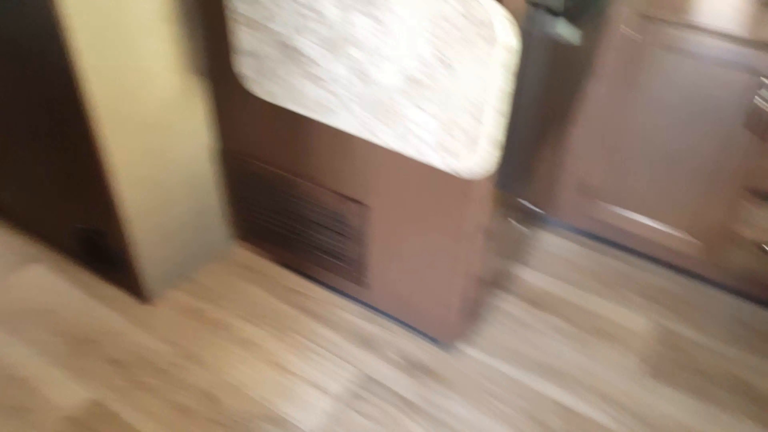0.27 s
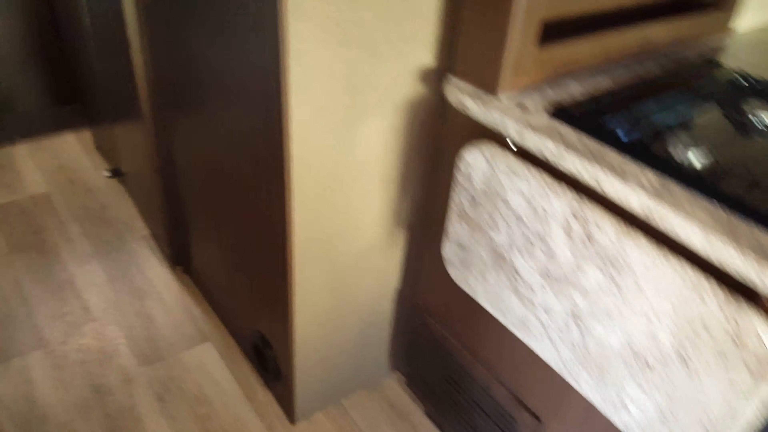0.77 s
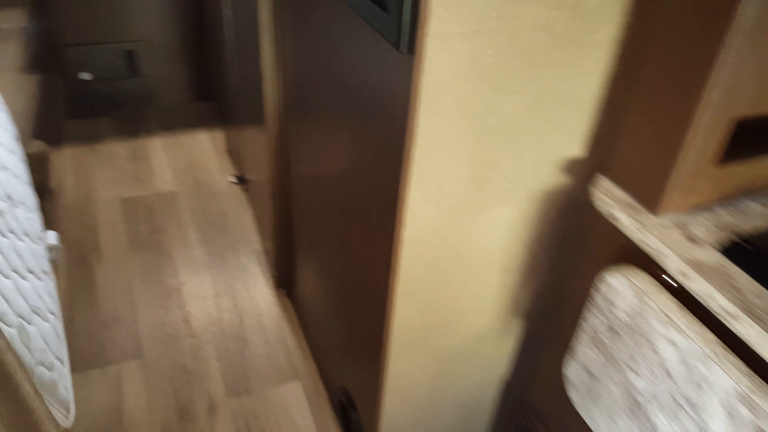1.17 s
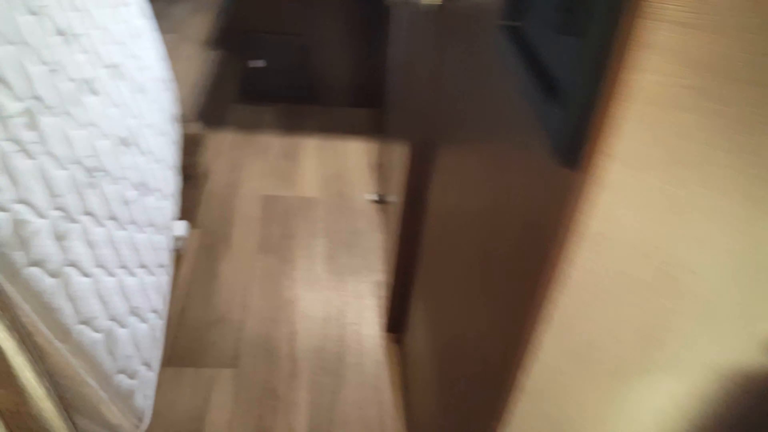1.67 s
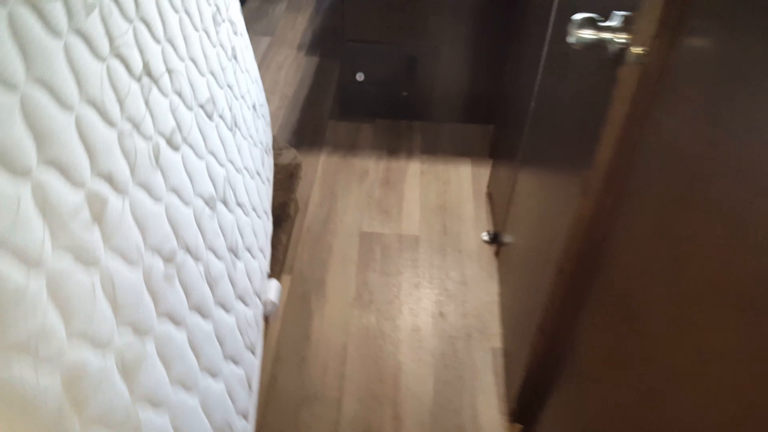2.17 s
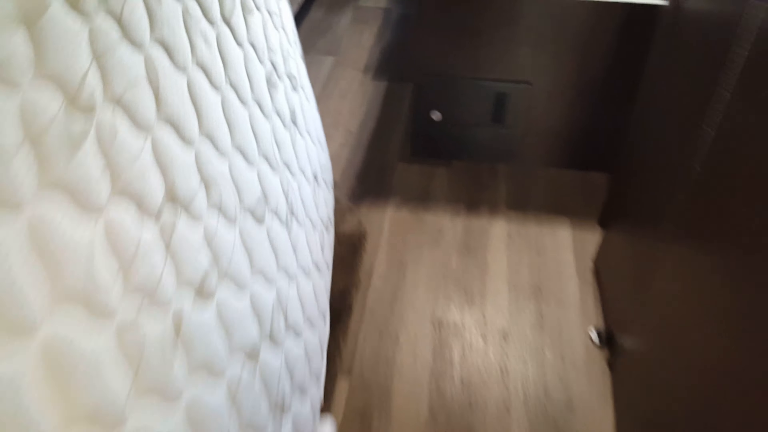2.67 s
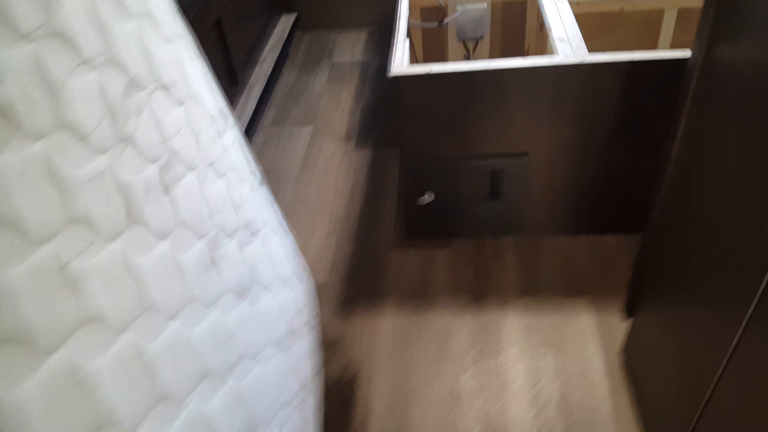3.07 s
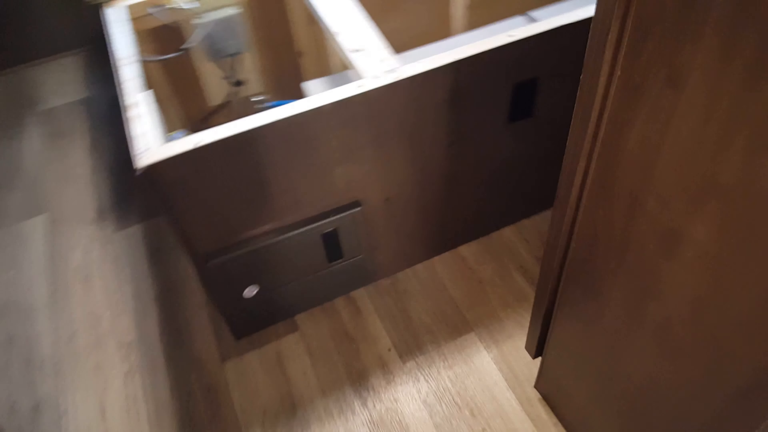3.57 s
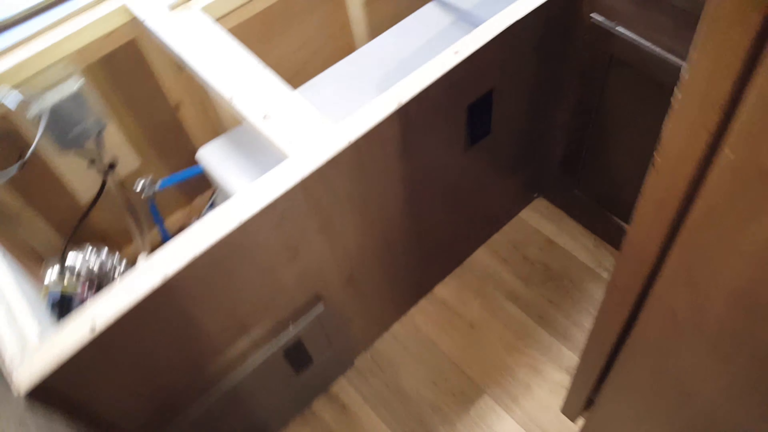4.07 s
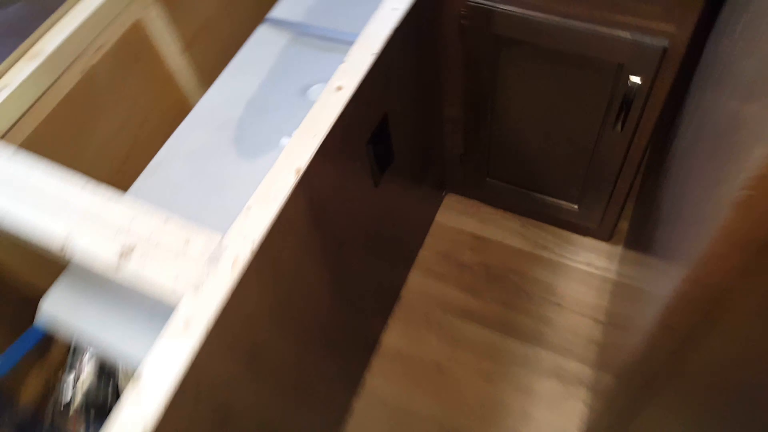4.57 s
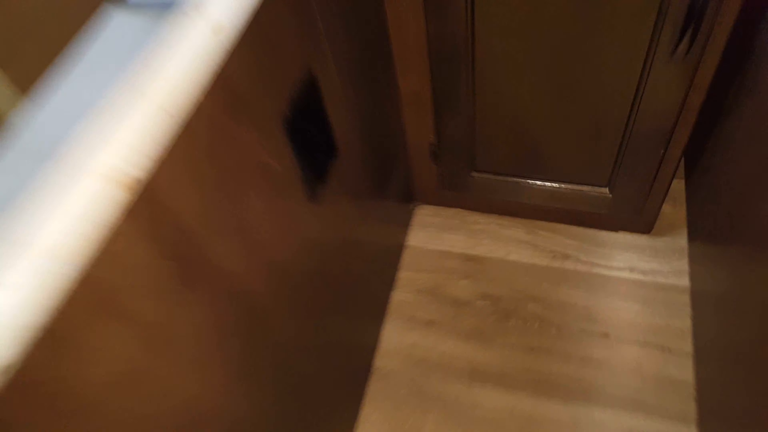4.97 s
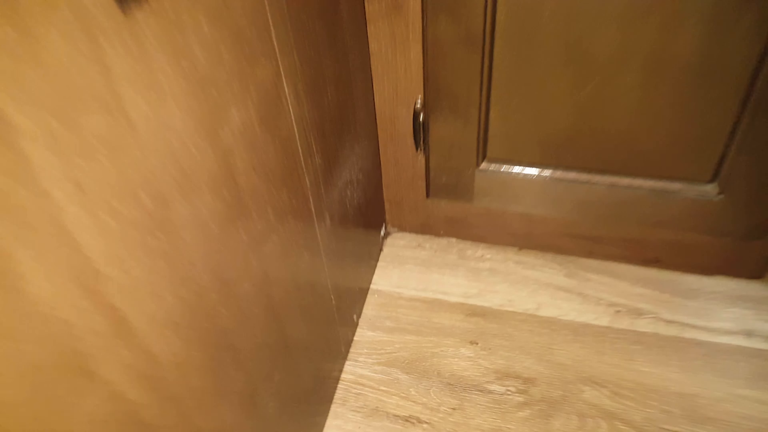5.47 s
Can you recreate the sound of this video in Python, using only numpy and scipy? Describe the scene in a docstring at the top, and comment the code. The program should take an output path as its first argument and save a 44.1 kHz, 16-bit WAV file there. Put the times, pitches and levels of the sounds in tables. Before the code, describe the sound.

A handheld microphone moves through a cramped camper interior. Hard, hollow floor thumps and small latch-like clicks come first, with cloth rustle and dangling keys tinkling. A burst of bright metal clatter rattles a door panel, fading in quick rebounds as the keys are held still. Then only muffled footsteps, tiny ticks, a brief scuff and a small creak remain, with short close-walled echo.

```python
"""In a small, furnished camper, someone walks about close to the microphone with a bunch of keys.
Heels thump on the hollow floor (struck boards, booming noise and modes, slaps) and the keys chink (ringing modes).
Then the bunch clatters loudly against a door and its lock: noise bursts and modes, with weakening rebounds.
Clicks and rustling clothes run throughout, over faint ticks, body rumble and quiet air;
softer steps, a scuff and then a creak follow the clatter."""
import sys
import numpy as np
from scipy import signal
from scipy.fft import rfft, irfft
from scipy.io import wavfile
from scipy.ndimage import uniform_filter1d, minimum_filter1d

SR = 44100
rng = np.random.default_rng(int(sys.argv[2]) if len(sys.argv) > 2 else 0)


def int16_out(signal):
    """Quantize to a 16-bit WAV file."""
    q = np.round(np.clip(np.atleast_2d(signal).T, -1, 1) * 32767)
    wavfile.write(sys.argv[1], SR, q.astype(np.int16))


N = 252252
T = np.arange(SR // 2) / SR  # time after a hit [s]

# contacts of the feet, heel and then the rest of the sole in the heavy steps: (time [s],
# pitch of the struck board [Hz], board level [dB], boom of the hollow floor [dB],
# slap of the sole [dB], click of the heel [dB])
FOOT_CONTACTS = [(.175, 175.5, -5.5, -15.5, -22, -18.5), (.187, 89.7, -8.5, -24.5, -39, -50),
                 (.750, 226.3, .5, -19, -25, -28), (.765, 251, -5.5, -24, -32.5, -51.5),
                 (.825, 163.5, -15.5, -31.5, -40, -61), (1.41, 108, -43, -45.5, -52, -60),
                 (1.499, 130, -33, -37, -47, -35.5), (1.933, 162, -26.5, -38, -36, -38),
                 (2.134, 126, -40, -32, -51, -55), (2.222, 94, -36, -43, -54, -64),
                 (2.611, 157.8, -59, -55, -50, -52.5), (2.78, 140, -47, -39.5, -48, -47),
                 (2.871, 133.1, -35.5, -35.5, -50, -44.5), (3.458, 168.5, -15, -28, -44, -41),
                 (4.059, 177, -34, -37, -42, -36.5), (4.141, 120.6, -25.5, -43, -46, -57),
                 (4.327, 195.3, -47.5, -49, -43, -50.5), (4.984, 129, -22.5, -37.5, -48.5, -49.5),
                 (5.142, 128, -31, -42.5, -56, -52.5)]
# modes of the hollow floor: (frequency [Hz], level [dB], t60 [s])
FLOOR_MODES = [(68, -28.5, 0.17), (102.3, -6, 0.74), (115.5, -3, 0.29), (181.8, -7, 0.14),
               (233.55, -6.5, 0.32), (408, -19, 0.083)]
# colour of the floor's boom: (frequency [Hz], relative level [dB per Hz])
BOOM_COLOUR = [(25, -26.5), (60, -2), (110, -4), (250, 1.5), (420, -2), (700, -14.5), (1300, -33.5),
               (4000, -60)]
# colour of the sole's slap: (frequency [Hz], relative level [dB per Hz])
SLAP_COLOUR = [(150, -11), (500, 2.5), (1200, 5), (2500, 4), (4000, -5.5), (6000, -9.5), (8000, -7.5),
               (9500, -28), (15000, -29.5)]
BOARD_CYCLES = 15  # a board dies away by 60 dB in this many swings, whatever its pitch
HEEL_HZ, HEEL_T60 = 2450, .026  # click of the hard heel in a soft step [Hz, s]
# a harder slap than this [dB] is a shorter contact, and the click is higher
HARD_SLAP_DB, HEEL_OCTAVES_PER_DB = -42, .034
HEEL_DULL_HZ = 7500  # the heel's click has little above this


def steps(rise_s=0.0019, modes_db=-3, boom_t60=0.15, slap_t60=.14, tick_db=0, tick_t60=0.0098,
          overtone=1.5, overtone_db=-7, overtone_t60=0.062, lowest_share=0.29):
    """Each contact bends one board, shakes the whole hollow floor, and slaps; returns thuds and slaps."""
    thuds, slaps = np.zeros((2, 2, N))
    floor = sum(amp(db) * fade(t60) * np.sin(2 * np.pi * hz * T) for hz, db, t60 in FLOOR_MODES)
    press = 1 - np.exp(-T / rise_s)  # the sole cushions the blow
    for s, hz, board_db, boom_db, slap_db, heel_db in FOOT_CONTACTS:
        board = np.sin(2 * np.pi * hz * T) * fade(BOARD_CYCLES / hz)
        board += amp(overtone_db) * np.sin(2 * np.pi * hz * overtone * T) * fade(overtone_t60)
        # a board radiates little below its pitch
        board = filtered(board * press, 2, hz * lowest_share, "highpass")
        boom = (burst(BOOM_COLOUR, boom_t60) - amp(modes_db) * floor) * press
        slap = burst(SLAP_COLOUR, slap_t60) + amp(tick_db) * burst(SLAP_COLOUR, tick_t60)
        octaves_up = HEEL_OCTAVES_PER_DB * max(slap_db - HARD_SLAP_DB, 0)
        heel = click(HEEL_HZ * 2 ** octaves_up, HEEL_T60, modes_db=-8.5)
        heel = filtered(heel, 2, HEEL_DULL_HZ)
        add(thuds, s, amp(boom_db) * boom - amp(board_db) * board)
        add(slaps, s, amp(slap_db) * slap + amp(heel_db) * heel, side(s))
    return thuds, slaps


# modes of the door and its lock plate: (frequency [Hz], level [dB], t60 [s])
DOOR_MODES = [(395, -5.5, .42), (477.5, -6.5, 0.17), (556.2, -6.5, .3), (728, -2, 0.33), (757, -3.5, 0.39),
              (847.3, -1.5, .36), (1140, 1, 0.27), (1175, -2.5, .3), (1614, -2.5, 0.27), (2494, 2, .3),
              (2574, 1.5, .25)]
# colour of the shaken door panel: (frequency [Hz], relative level [dB per Hz])
PANEL_COLOUR = [(60, -36.5), (200, -18), (350, 1), (600, -1.5), (1200, 0.5), (2000, 1), (2900, 2),
                (4000, -12), (6500, -20.5), (10000, -30), (16000, -39.5)]
# colour of key clashing on key: (frequency [Hz], relative level [dB per Hz])
CLASH_COLOUR = [(400, -23.5), (1500, -11), (3000, 0), (5200, 1.5), (6400, 1), (7300, -4.5), (8400, -0.5),
                (9800, -13), (11200, -16.5), (14000, -16), (16000, -20)]
# colour of the door's long after-ring: (frequency [Hz], relative level [dB per Hz])
AFTER_RING_COLOUR = [(600, -33.5), (860, -10), (1150, -30.5), (1750, -0.5), (1980, -3.5), (2250, -5),
                     (2700, -28.5), (6000, -44)]


def clatter(panel_t60=0.23, clash_t60=0.15, door_modes_db=-8, after_db=-26, after_t60=0.71,
            pan_db=1.0, gripped_s=2.103, grip_t60=0.26):
    """Each blow shakes the door, clashes key on key and leaves the keys ringing until the bunch is held still."""
    out, ringing = np.zeros((2, 2, N))
    for s, door_db, clash_db, keys_db in contacts():
        bounces = chatter(per_s=300, grain_s=.001, depth=.7)
        panel = burst(tinted(PANEL_COLOUR), panel_t60, spacing_hz=40.6) * (.5 + .5 * bounces)
        door = panel + amp(door_modes_db) * ring(DOOR_MODES, detune=0.0018, scatter_db=-4)
        door += amp(after_db) * burst(AFTER_RING_COLOUR, after_t60)
        # every contact wakes other partials
        clash = burst(tinted(CLASH_COLOUR), clash_t60, spacing_hz=59.6) * bounces
        add(out, s, amp(door_db) * door + amp(clash_db) * clash, pan_db)
        add(ringing, s, amp(keys_db) * bunch_ring(), 3.5)
    held_s = np.maximum(np.arange(N) / SR - gripped_s, 0)
    return out + ringing * amp(-60 * held_s / grip_t60)


# the bunch strikes the door and lock: (time [s], door level [dB], clash of metal [dB], ring of the keys [dB],
# loss per rebound [dB])
BLOWS = [(1.851, -17, -11, -19.5, 2.5), (1.898, -22.5, -18.5, -23, 3.5), (1.939, -15.5, -17, -17.5, 2),
         (2.036, -22.5, -27, -31, 3.5), (2.090, -31.5, -29, -33.5, 2), (2.176, -31, -34, -50, 8)]
REBOUND_S, REBOUND_GROWTH = .012, 1.2  # first gap between bounces [s], and each gap against the one before


def contacts(count=5):
    """Each blow and its ever slower, weaker rebounds: rows of (time [s], door [dB], clash [dB], keys [dB])."""
    gaps = [REBOUND_S * REBOUND_GROWTH ** k for k in range(count - 1)]
    delays = np.cumsum([0] + gaps)
    rows = []
    for s, door_db, clash_db, keys_db, loss_db in BLOWS:
        for k, delay in enumerate(delays):
            lost_db = k * loss_db
            rows.append((s + delay, door_db - lost_db, clash_db - lost_db, keys_db - lost_db))
    return rows


def chatter(per_s, grain_s, depth):
    """A gain that jumps at each tiny random impact and drops again, for bouncing keys or a grainy sole."""
    impacts = rng.exponential(1, len(T)) * (rng.random(len(T)) < per_s / SR)
    power = signal.lfilter([1], [1, -np.exp(-1 / (grain_s * SR))], impacts)
    return np.sqrt(1 - depth + depth * power / power.mean())


def tinted(spectrum):
    """Each blow lands on another spot and favours other pitches."""
    return [(hz, db + 2 * rng.standard_normal()) for hz, db in spectrum]


# modes of the keys: (frequency [Hz], level [dB], t60 [s])
KEY_MODES = [(4730, -21.5, .15), (7340, -7.5, 0.28), (6930, -2, 0.31), (7440, -9, .1), (7470, -8.5, 0.19),
             (7600, -8, 0.082), (7590, -3.5, 0.72), (8650, -11.5, 0.12), (10500, -23.5, 0.22),
             (11120, -13, 0.24), (12200, -20.5, 0.071), (12500, -18, 0.1435), (13200, -11, 0.49),
             (14160, -27, 0.18)]


def bunch_ring(spread=0.012, neighbours_db=-1, neighbours_t60=0.16):
    """One key rings freely; its neighbours, cut a little differently, are soon damped."""
    free = ring(KEY_MODES, detune=0.0043, scatter_db=-1.0)
    neighbours = ring(KEY_MODES, spread, scatter_db=3.5) + ring(KEY_MODES, spread, scatter_db=3.5)
    return amp(-4.5) * free + amp(neighbours_db) * neighbours * fade(neighbours_t60)


# the keys swing against each other: (time [s], level before softening [dB])
CHINKS = [(0., -44), (0.535, -48), (1.027, -50), (1.179, -41), (1.225, -45), (1.73, -58.5)]


def chinks(pan_db=3.0, damped_t60=0.29, soft_hz=7600):
    """Hanging keys touch lightly, which wakes mostly their lower modes."""
    out = np.zeros((2, N))
    for s, db in CHINKS:
        touch = bunch_ring() * fade(damped_t60) + amp(-7.5) * burst(CLASH_COLOUR, .012)
        add(out, s, amp(db) * touch, pan_db)
    return filtered(out, 1, soft_hz)


# clicks and knocks of latches and fittings: (time [s], level [dB], centre frequency [Hz], t60 [s])
CLICKS = [(.057, -29, 3600, .026), (.109, -34, 2100, 0.018), (.125, -44, 7700, 0.012),
          (.231, -35.5, 4200, 0.1), (0.261, -30, 7600, .04), (0.354, -45, 6400, 0.013),
          (0.4016, -30, 4920, 0.0049), (.487, -42.5, 4580, 0.083), (.712, -49.5, 2300, 0.11),
          (2.347, -47.5, 6370, 0.12), (2.873, -38, 725, 0.043), (3.182, -55.5, 6100, 0.043),
          (3.367, -50.5, 2660, 0.11), (3.415, -54, 2460, 0.13), (3.86, -47, 6240, 0.038),
          (4.326, -48, 5900, 0.096), (5.681, -53, 2400, 0.042)]


def clicks():
    """Latches and fittings click as the walker passes."""
    out = np.zeros((2, N))
    for s, db, hz, t60 in CLICKS:
        add(out, s, amp(db) * click(hz, t60), side(s))
    return out


# overtones of a small fitting: (factor on its centre pitch [ratio], level [dB])
FITTING_OVERTONES = [(.58, -9), (1.001, -2), (1.041, 1), (1.47, -13)]


def click(hz, t60, below_db=-20, above_db=-17, tick_db=0, tick_t60=0.011, modes_db=-5):
    """A short dry tick: a hard contact, a broad resonance and a few brief overtones."""
    colour = [(hz / 4, below_db), (hz / 2, -4), (hz, 0), (hz * 1.5, -5),
              (hz * 2.5, above_db), (hz * 5, 2 * above_db)]
    modes = [(hz * factor, level_db, .035) for factor, level_db in FITTING_OVERTONES]
    overtones = ring(modes, detune=0, scatter_db=1.0)
    return burst(colour, t60) + amp(modes_db) * overtones + amp(tick_db) * burst(colour, tick_t60)


def scuff(first_hz=1500, last_hz=2900, width_hz=2200, db=-50):
    """A sole drags over the boards: grainy noise in a rising resonance."""
    s, length_s = 4.405, .105
    size = round(length_s * SR)
    grains = rng.standard_normal((2, size)) * chatter(per_s=790, grain_s=0.0023, depth=0.56)[:size]
    band = filtered(grains, 2, width_hz / 2)
    carrier = np.cos(2 * np.pi * np.cumsum(np.linspace(first_hz, last_hz, size)) / SR)
    out = np.zeros((2, N))
    add(out, s, amp(db) * evened(band * carrier) * np.hanning(size))
    return out


def creak(first_hz=430, last_hz=385, db=-40, rough=0.16):
    """A floor panel slips under the foot with a short falling tone."""
    s, length_s = 5.312, .046
    size = round(length_s * SR)
    turns = np.cumsum(np.linspace(first_hz, last_hz, size)) / SR
    roughness = noise([(120, -28), (260, 8.0), (480, -4.5), (800, -20.5), (3000, -53.5)], size)
    tone = np.sin(2 * np.pi * turns) + rough * roughness
    envelope = np.interp(np.linspace(0, 1, size), [0, .2, 1], [0, 1, 0])
    out = np.zeros((2, N))
    add(out, s, amp(db) * tone * envelope)
    return out


# sweeps of the walker's clothes: (time of the peak [s], rise [s], fall [s], level [dB])
SWISHES = [(.01, 0.21, 0.4, -48.5), (0.419, 0.12, 0.07, -51.5), (1.09, 0.082, 0.13, -53),
           (1.46, 0.013, 0.033, -52.5), (1.849, 0.052, .12, -47.5), (2.83, 0.041, .11, -56),
           (4.791, 0.23, 0.064, -51.5), (5.549, 0.17, 0.25, -57)]
# colour of rubbing cloth: (frequency [Hz], relative level [dB per Hz])
CLOTH_COLOUR = [(100, 2.5), (400, 2.5), (900, -2.5), (2200, 0), (4000, -6), (8000, -7), (9500, -18.5),
                (15000, -14.5)]
# a trouser leg brushes with every contact of the feet: level, and rise and fall
STEP_SWISH_DB, STEP_SWISH_S = -68, 0.1
CLOTH_REST_DB = -68.5  # the clothes never fall quite still


def rustle(grain_db=1.5, pan_share=0.97):
    """Cloth rubs in small uneven catches, with each contact of the feet and in separate sweeps."""
    power = np.full(N, amp(CLOTH_REST_DB) ** 2)
    for s, rise_s, fall_s, db in SWISHES:
        power += (amp(db) * swell(s, rise_s, fall_s)) ** 2
    for s, *_ in FOOT_CONTACTS:
        power += (amp(STEP_SWISH_DB) * swell(s, STEP_SWISH_S, STEP_SWISH_S)) ** 2
    catches = evened(uniform_filter1d(rng.standard_normal(N), 300))
    cloth = evened(noise(CLOTH_COLOUR, N) * amp(grain_db * catches))
    pan_db = pan_share * side(np.arange(N) / SR)
    return np.sqrt(power) * cloth * amp([pan_db / 2, -pan_db / 2])


TICKS_PER_S, TICK_DB, TICK_HZ, TICK_T60 = 1.8, -62, 4500, .025  # middle level and pitch; t60 [s]


def ticks(spread_db=2.5, spread_octaves=.45):
    """The furniture ticks faintly, once in each equal time slot, at a random moment and pitch."""
    out = np.zeros((2, N))
    draws = 2 * rng.random((int(TICKS_PER_S * N / SR), 3)) - 1
    for slot, (when, strength, pitch) in enumerate(draws):
        s = (slot + (1 + when) / 2) / TICKS_PER_S
        tick = click(TICK_HZ * 2 ** (spread_octaves * pitch), TICK_T60)
        add(out, s, amp(TICK_DB + spread_db * strength) * tick, side(s))
    return out


# colour of the body's light rumble: (frequency [Hz], relative level [dB per Hz])
RUMBLE_COLOUR = [(20, -10), (35, -11), (55, -5.5), (115, 1.5), (230, -8), (450, -19.5), (1000, -25.5),
                 (3000, -58)]
# colour of the deep rocking: (frequency [Hz], relative level [dB per Hz])
SWAY_COLOUR = [(18, 4.5), (35, 1), (55, -7.5), (110, -11), (230, -17), (450, -34), (1000, -48), (3000, -71)]
# the body rocks on its springs under a full-scale contact, and settles
SWAY_DB, SWAY_RISE_S, SWAY_FALL_S = -32.5, .04, 0.19
SWAY_GROWTH = 4.8  # dB of rocking per dB of contact: light steps hardly move the springs
SWAY_LAG_S = 0.047  # rumble and rocking are greatest this long after each contact
REST_DB = -63  # rumble of the body between steps
STIR_DB, STIR_S = -60, 0.13  # every contact, however light, stirs that rumble: level, and fall


def rumble():
    """The vehicle's body rumbles a little with each contact and rocks deeply under the heavy ones."""
    stir_power, sway_power = amp(REST_DB) ** 2, 0
    for s, _, board_db, boom_db, *_ in FOOT_CONTACTS:
        weight = np.hypot(amp(board_db), amp(boom_db))
        peak_s = s + SWAY_LAG_S
        stir = amp(STIR_DB) * swell(peak_s, SWAY_RISE_S, STIR_S)
        sway = amp(SWAY_DB) * weight ** SWAY_GROWTH * swell(peak_s, SWAY_RISE_S, SWAY_FALL_S)
        stir_power = stir_power + stir ** 2
        sway_power = sway_power + sway ** 2
    return np.sqrt(stir_power) * noise(RUMBLE_COLOUR, N) + np.sqrt(sway_power) * noise(SWAY_COLOUR, N)


# colour of the quiet air: (frequency [Hz], relative level [dB per Hz])
AIR_COLOUR = [(15, -28.5), (25, -2), (48, -6), (149, 0.5), (212, -5.5), (354, -12.5), (503, -9.5),
              (714, -12.5), (2160, -17), (3920, -26), (7920, -25.5), (9570, -32.5), (14800, -28),
              (16000, -38.5)]


def air(db=-63.5):
    """Quiet air in the cabin: steady coloured noise."""
    return amp(db) * noise(AIR_COLOUR, N)


# decay of the cabin's echoes: (frequency [Hz], t60 [s])
CABIN_DECAY = [(80, .6), (250, .48), (800, 0.63), (2500, 0.33), (7000, 0.36), (14000, 0.16)]


def cabin(x, gap_s=0.0071):
    """Close walls answer after a few milliseconds; the treble dies first in the upholstery."""
    hz, t, z = signal.stft(noise([(20, 0), (20000, 0)], len(T)), SR, nperseg=256)
    decay = amp(-60 * t / read(CABIN_DECAY, hz)[:, None])
    tail = signal.istft(z * decay, SR, nperseg=256)[1][:, :len(T)]
    tail = tail * (T > gap_s)
    return signal.fftconvolve(x, tail / np.linalg.norm(tail[0]), axes=1)[:, :N]


# the walker turns, and near sounds move to the right: (time [s], left over right [dB])
TURN = [(0, 1.5), (2.6, 3.5), (3.5, -2.5), (5.72, -2)]


def side(s):
    """Left-right dB of the near sounds at a time."""
    return np.interp(s, *np.transpose(TURN))


# likeness of left and right in the noises: (frequency [Hz], correlation [-1 to 1])
LIKENESS = [(100, 0.97), (330, 0.86), (600, 0.79), (1100, -.05), (3000, .03), (16000, -0.32)]


def noise(spectrum, size, spacing_hz=0):
    """Coloured noise at two microphones, alike in the bass; a spacing thins it into scattered partials."""
    hz = np.fft.rfftfreq(size, 1 / SR)
    kept = rng.random(len(hz)) * spacing_hz < hz[1]
    a, b = rfft(rng.standard_normal((2, size))) * kept
    same = np.clip(read(LIKENESS, hz), -1, 1)
    mid, side_part = a * np.sqrt(1 + same), b * np.sqrt(1 - same)
    stereo = np.array([mid + side_part, mid - side_part])
    return evened(irfft(stereo * amp(read(spectrum, hz)), size))


def burst(spectrum, t60, spacing_hz=0):
    """Many crowded modes struck at once: they start at about rms 1 and die together."""
    shape = fade(t60)
    return evened(noise(spectrum, len(T), spacing_hz) * shape) * np.sqrt(np.mean(shape ** 2))


def ring(modes, detune, scatter_db):
    """Separate modes, struck at a new spot each time and reaching each microphone in its own phase."""
    out = np.zeros((2, len(T)))
    for hz, db, t60 in modes:
        shift, strength = rng.standard_normal(2)
        turns = hz * (1 + detune * shift) * T + rng.random((2, 1))
        out += amp(db + scatter_db * strength) * fade(t60) * np.sin(2 * np.pi * turns)
    return out / np.sqrt(sum(amp(db) ** 2 for _, db, _ in modes) / 2)


def fade(t60):
    """Exponential decay after a hit, 60 dB in t60 seconds."""
    return np.exp(-np.log(1000) * T / max(t60, 1e-3))


def swell(s, rise_s, fall_s):
    """A gain that grows to 1 at a time and then dies away."""
    t = np.arange(N) / SR - s
    return np.exp(np.minimum(t / max(rise_s, 1e-3), -t / max(fall_s, 1e-3)))


def filtered(x, order, hz, kind="lowpass"):
    """Butterworth filter with its corner at hz."""
    return signal.sosfilt(signal.butter(order, hz, kind, fs=SR, output="sos"), x)


def amp(db):
    """Decibels to gain."""
    return 10 ** (np.asarray(db) / 20)


def evened(x):
    """Scales to rms 1."""
    return x / np.sqrt(np.mean(x ** 2) + 1e-20)


def read(points, hz):
    """Reads a table on a log-frequency axis."""
    f, value = np.transpose(points)
    return np.interp(np.log(hz + 1), np.log(f + 1), value)


def add(mix, s, sound, pan_db=0):
    """Mixes a sound in at its time and side; positive pan is louder on the left."""
    part = mix[:, max(round(s * SR), 0):][:, :sound.shape[-1]]
    part += (sound * amp([[pan_db / 2], [-pan_db / 2]]))[:, :part.shape[1]]


def scene():
    """Steps, keys and small noises in the cabin, over quiet air."""
    thuds, slaps = steps()
    bunch, keys = clatter(), chinks()
    small = clicks() + scuff() + creak()
    into_cabin = amp(-14.5) * thuds + amp(-6) * slaps + amp(-18.5) * small
    into_cabin += amp(-7.5) * keys + amp(-13.0) * bunch
    background = rustle() + ticks() + rumble() + air()
    return thuds + slaps + small + keys + bunch + cabin(into_cabin) + background


def record(dry, low_cut_hz=40, edge_hz=16400):
    """The microphone's bass roll-off, a quick peak limiter and the recorder's band limit."""
    thinned = filtered(dry, 2, low_cut_hz, "highpass")
    headroom = np.minimum(.85 / (abs(thinned).max(0) + 1e-9), 1)
    limited = thinned * uniform_filter1d(minimum_filter1d(headroom, size=121), size=121)
    band_limit = signal.firwin(511, edge_hz, window=("kaiser", 9), fs=SR)
    return signal.oaconvolve(limited, band_limit[None], "same")


dry = scene()
out = record(dry)
int16_out(out)
```